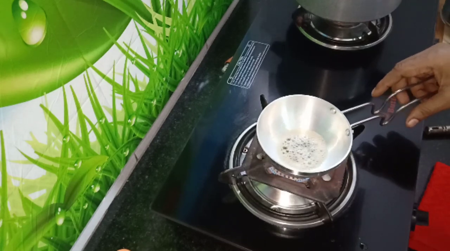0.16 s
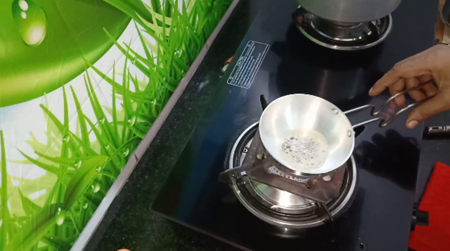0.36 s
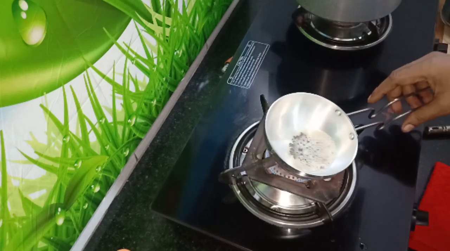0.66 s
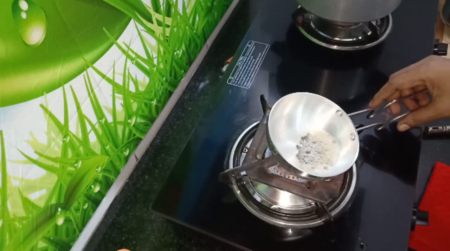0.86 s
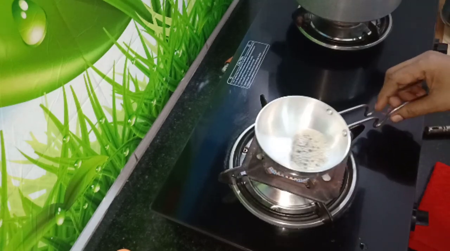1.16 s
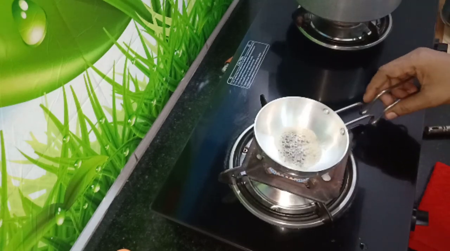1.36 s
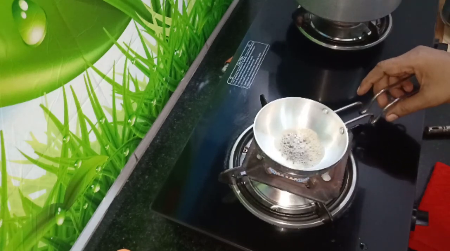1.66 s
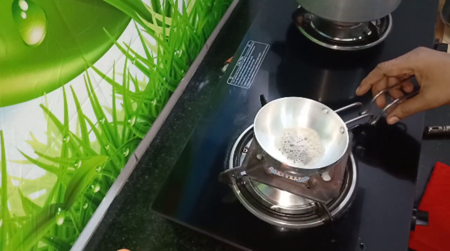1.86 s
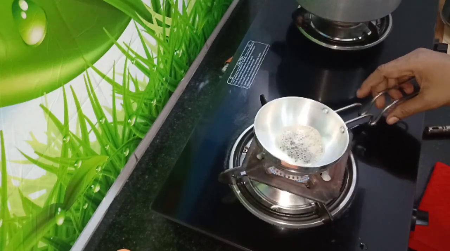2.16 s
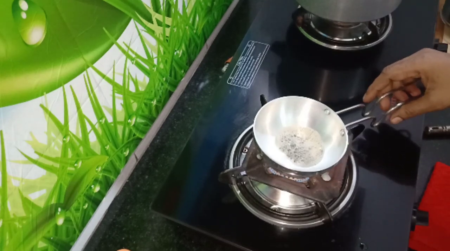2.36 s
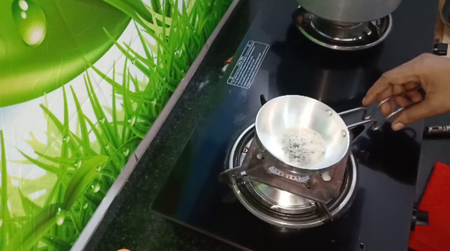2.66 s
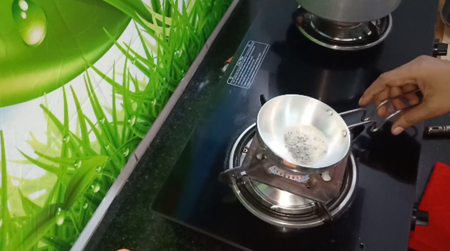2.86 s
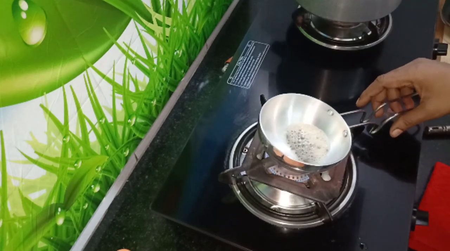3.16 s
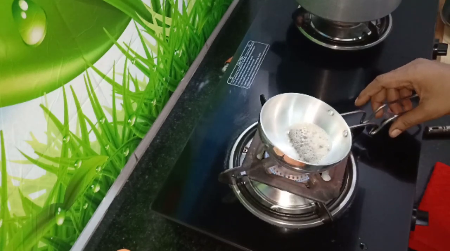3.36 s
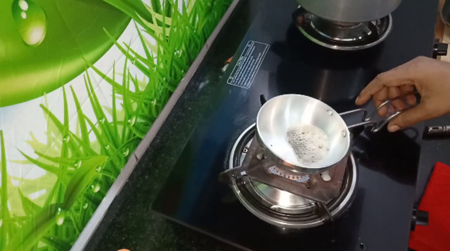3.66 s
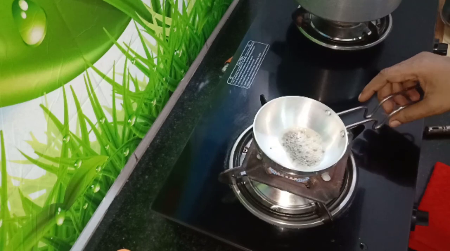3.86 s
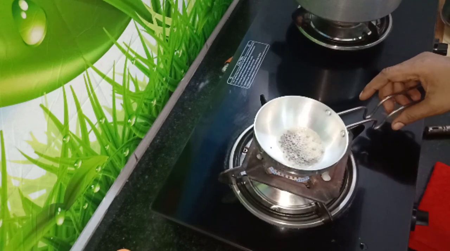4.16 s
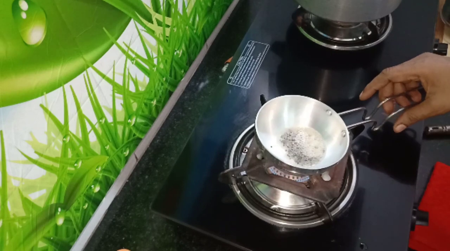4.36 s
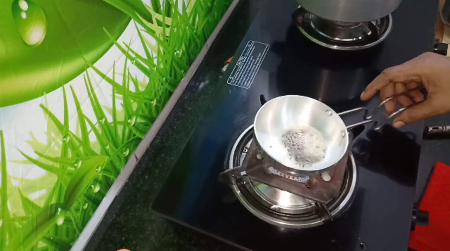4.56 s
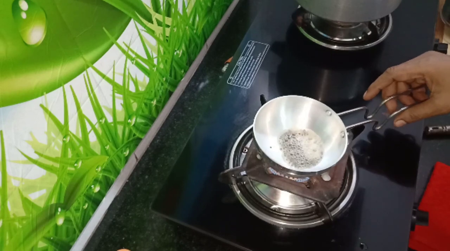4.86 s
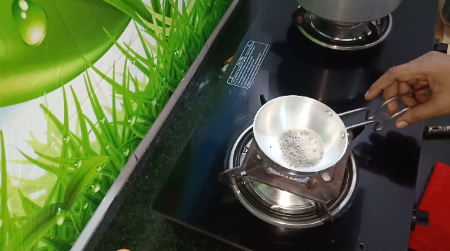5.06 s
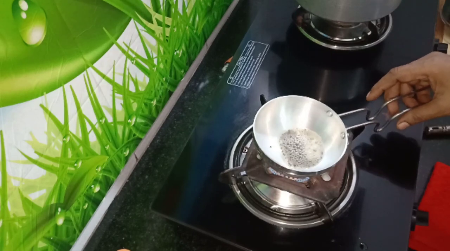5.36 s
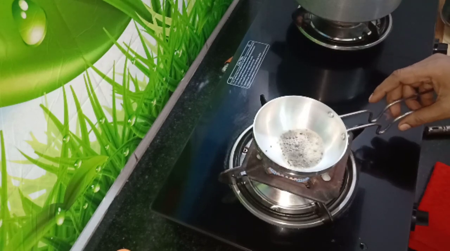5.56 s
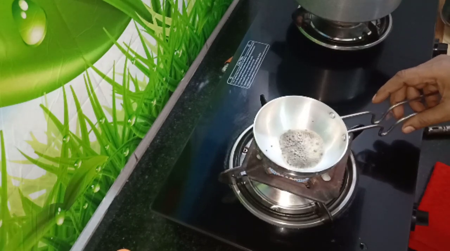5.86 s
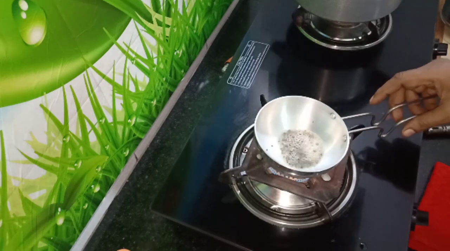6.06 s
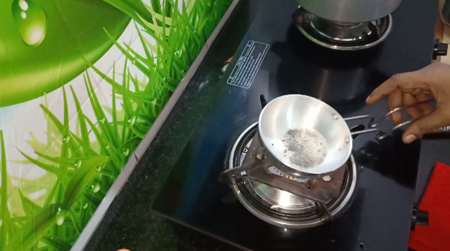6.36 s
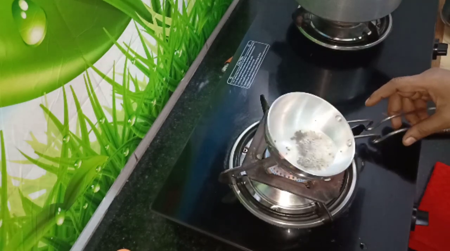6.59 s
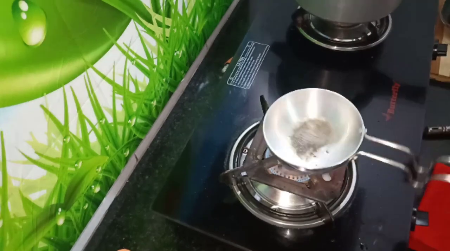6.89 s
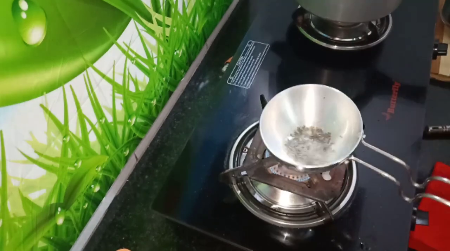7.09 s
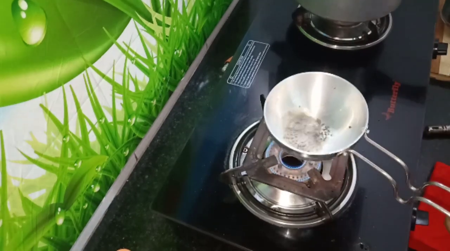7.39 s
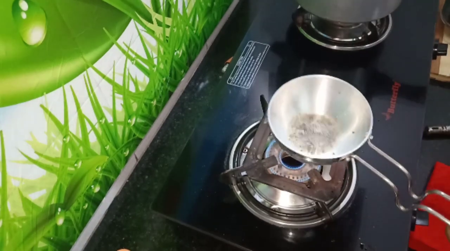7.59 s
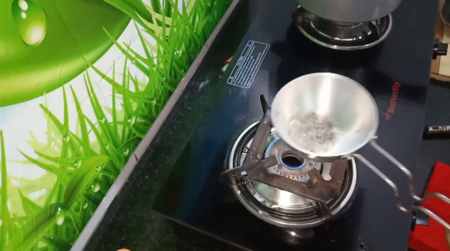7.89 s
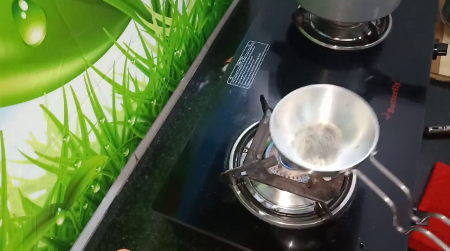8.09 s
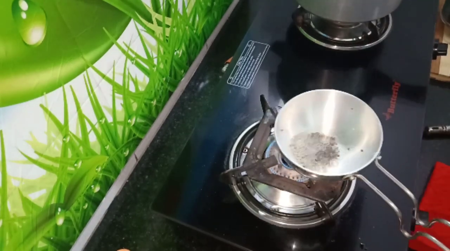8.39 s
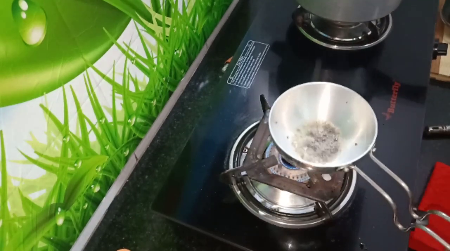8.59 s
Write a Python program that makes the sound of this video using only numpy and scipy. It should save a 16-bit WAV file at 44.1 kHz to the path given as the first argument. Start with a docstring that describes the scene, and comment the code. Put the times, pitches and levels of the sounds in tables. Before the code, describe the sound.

A close view of a small metal pan on a gas burner in a reflective kitchen. Throughout, a soft, dark flame rush and a faint, wavering motor hum around 100 Hz stay in the background. From 0 to 3 s, mustard seeds pop singly, each a bright crack with a very short ring near 3 kHz; a loud one comes at 0.8 s. Dull pan knocks and scrapes sound around 1.1-1.4 and 2.2 s, then at 3.7, 4.5, 5.6 and, strongest, 5.9 s. A low thump of spatter strikes the microphone at 4.2 s. From 4.4 s pops cluster, with fine frying ticks between. After 6 s they become rapid and hard, and from about 7 s a dense, loud crackle runs unbroken to the cut at 8.7 s. Sharp spatter snaps hit the microphone, especially around 6.7-7.2 s, and at 7.7-8.2 s.

```python
"""The rush of a gas flame and a wavering motor hum come first (shaped noise, sines); mustard seeds burst over them.
Each pop is a bright crack and a short resonance, echoed in the metal pan and the kitchen; single pops become a
dense crackle, and fine frying ticks, random in time, grow in between as the oil heats.
The pan shifts on its grate now and then (slips excite its modes and a rasp), and a few flying seeds and oil drops
hit the microphone (a snap and a relaxing pressure jump)."""
import sys
import numpy as np
from scipy import signal
from scipy.fft import rfft, irfft
from scipy.io import wavfile

SR = 44100
rng = np.random.default_rng(int(sys.argv[2]) if len(sys.argv) > 2 else 0)


def inscribe(sig):
    """Save sig as 16-bit PCM at rate SR to the path in sys.argv[1].

    A 1-D sig is mono; a 2-D sig holds one channel per row.
    Samples are clipped to [-1, 1] before scaling.
    """
    pcm = np.round(np.clip(np.atleast_2d(sig).T, -1, 1) * 32767)
    wavfile.write(sys.argv[1], SR, pcm.astype(np.int16))


N = 384974
TIME = np.arange(N) / SR
SIZE = 2048  # samples in a short pulse
HZ = np.maximum(np.arange(SIZE // 2 + 1) * SR / SIZE, 1)


def from_db(db):
    """Level: decibels to amplitude gain."""
    return 10 ** (np.asarray(db) / 20)


def rms_one(x):
    """Normalization: scale to unit rms."""
    return x / np.sqrt(np.mean(x ** 2) + 1e-20)


def colour(points, hz):
    """Spectral envelope: gain interpolated in dB over log frequency."""
    at, db = np.transpose(points)
    return from_db(np.interp(np.log(hz + 1e-9), np.log(at), db))


def causal(gain):
    """Minimum phase: the most compact causal pulse with this spectrum, at unit energy."""
    cepstrum = irfft(np.log(gain + 1e-9))
    # fold the anticausal half onto the causal half
    cepstrum[1:SIZE // 2] *= 2
    cepstrum[SIZE // 2 + 1:] = 0
    pulse = irfft(np.exp(rfft(cepstrum)))
    return pulse / np.linalg.norm(pulse)


def add(out, s, sound):
    """Superposition: mix a sound in at a time in seconds."""
    i = int(np.clip(round(s * SR), 0, N - 1))
    out[i:i + len(sound)] += sound[:N - i]


def ring(x, hz, t60):
    """Modal resonance: a driven mode that decays by 60 dB in t60 seconds."""
    radius = 1000 ** (-1 / (t60 * SR))
    w = 2 * np.pi * hz / SR
    return signal.lfilter([0, np.sin(w)], [1, -2 * radius * np.cos(w), radius ** 2], x + 1e-18)


# spectral envelope of the flame: f/Hz, relative level/dB
FLAME_COLOUR = [(20, -40), (45, -16), (75, -6.5), (95, -2), (180, -5.5), (370, -3), (500, -12),
                (850, -12.5), (1200, -16), (3500, -22.5), (4600, -32), (5600, -42.5), (7300, -34),
                (8700, -36), (10000, -44), (15500, -44)]


def flame(level_db=-45.5):
    """Turbulent combustion noise: a steady random rush with a fixed spectral envelope."""
    spectrum = rfft(rng.standard_normal(N))
    rush = irfft(spectrum * colour(FLAME_COLOUR, np.fft.rfftfreq(N, 1 / SR)), N)
    return from_db(level_db) * rms_one(rush)


# swelling and fading of the motor's lowest tone, before the random throb: t/s, level/dB
HUM_SWELL = [(0, -51), (.3, -55), (.7, -45), (1.2, -53), (1.7, -49.5), (2.5, -49.5), (2.9, -57),
             (3.5, -56.5), (4.3, -49), (4.95, -45.5), (5.3, -55.5), (6.4, -50.5), (7.5, -57), (8.73, -50.5)]
# the motor's other tones, before the random throb: f/Hz, level/dB
HUM_TONES = [(146, -57), (221, -57.5), (258, -60), (333, -71), (367, -57), (845, -65.5)]
HUM_HZ = 96.4  # mean pitch of the lowest tone


def motor(waver_hz=4.72, throb_db=2.5, count=110):
    """Frequency and amplitude modulation: low tones waver at random in pitch and strength."""
    out = 0
    knots = np.linspace(0, TIME[-1], count)
    lowest_db = np.interp(TIME, *np.transpose(HUM_SWELL))
    for hz, level_db in [(HUM_HZ, lowest_db), *HUM_TONES]:
        waver, throb = (np.interp(TIME, knots, chance) for chance in rng.standard_normal((2, count)))
        tone = np.sin(2 * np.pi * np.cumsum(hz + waver_hz * waver) / SR)
        out = out + from_db(level_db + throb_db * throb) * rms_one(tone)
    return out


# decay of the kitchen: f/Hz, reverberation time T60/s
KITCHEN_T60 = [(200, 0.65), (1500, 0.37), (3300, 0.34), (8000, 0.3), (15000, 0.34)]
# reflections off hob and wall: delay/s, level/dB
REFLECTIONS = [(.0057, -35), (.0074, -16.5), (0.017, -31.5), (0.0156, -17.5)]


def kitchen(x, wet_db=-10.0, build_s=0.0072):
    """Reverberation: early reflections and a diffuse tail that builds up, then decays band by band."""
    t = np.arange(SR // 2) / SR
    edges = np.geomspace(120, 17000, 9)
    tail = 0
    for low, high in zip(edges, edges[1:]):
        band_pass = signal.butter(2, [low, high], "band", fs=SR, output="sos")
        band = signal.sosfilt(band_pass, rng.standard_normal(len(t)))
        t60 = np.interp(np.sqrt(low * high), *np.transpose(KITCHEN_T60))
        tail = tail + band * 1000 ** (-t / t60)
    tail = tail * (1 - np.exp(-(t / build_s) ** 2))
    response = from_db(wet_db) * tail / np.linalg.norm(tail)
    for delay_s, level_db in REFLECTIONS:
        add(response, delay_s, from_db([level_db]))
    return signal.oaconvolve(x, response)[:N]


# the pan knocks and slides on the grate: t/s, level/dB, slide time constant/s, favoured mode f/Hz
SHIFTS = [(1.07, -36, 0.023, 320), (1.186, -41.5, 0.012, 260), (1.346, -41.5, 0.026, 475),
          (2.152, -33, 0.016, 412), (2.188, -37, 0.0078, 260), (3.698, -35.5, 0.012, 560),
          (4.497, -35.5, 0.02, 415), (5.541, -49, 0.00067, 2060), (5.613, -34.5, 0.0031, 1130),
          (5.637, -43, 0.0045, 260), (5.869, -27, 0.0044, 475)]
# modes of the pan on its grate: f/Hz, relative level/dB, T60/s
GRATE_MODES = [(259.6, 7.5, 0.2), (473.4, 14, 0.1), (515, 1, 0.16), (804, 0.5, 0.11), (906, 0, 0.16),
               (1160, 3.5, 0.02), (1354, -6, 0.072), (2020, 1.5, 0.024), (2720, 0, 0.012)]
# spectral envelope of the sliding rasp: f/Hz, relative level/dB
RASP_COLOUR = [(40, -55), (150, -24), (280, -14), (500, 14), (700, 11.5), (1200, 3.5), (2600, -0.5),
               (4000, -7), (8000, -60)]


def pan_shifts(slips_per_s=1600, rasp_db=-6, favour_db=16.5, choosiness=10.0):
    """Stick-slip excitation: a run of slips swells and dies, driving the pan's modes and a dull rasp."""
    out = np.zeros(N)
    t = np.arange(SR // 2) / SR
    for s, level_db, slide_s, favoured_hz in SHIFTS:
        slipping = rng.random(len(t)) < slips_per_s / SR
        slips = rng.standard_normal(len(t)) * slipping * t * np.exp(-t / slide_s)
        modes = 0
        for hz, mode_db, t60 in GRATE_MODES:
            # the place of contact favours a mode
            nearness = np.exp(-(choosiness * np.log(hz / favoured_hz)) ** 2)
            modes = modes + from_db(mode_db + favour_db * nearness) * rms_one(ring(slips, hz, t60))
        rasp = signal.fftconvolve(slips, causal(colour(RASP_COLOUR, HZ)))[:len(t)]
        sound = rms_one(modes) + from_db(rasp_db) * rms_one(rasp)
        # the level refers to the first 50 ms
        add(out, s, from_db(level_db) * sound / np.std(sound[:SR // 20]))
    return out


# hits on the microphone: t/s, signed pressure factor before rise and filters, relaxation time/ms
SPATTER = [(4.1660, 5, 1), (5.9643, 1.2, 1), (6.1223, 0.15, 0.26), (6.7249, 1.4, 0.092),
           (6.9268, 1.17, 0.087), (7.0780, 0.23, 0.16), (7.1034, 1.05, 0.12), (7.1474, -1.5, 0.12),
           (7.1631, 1.5, 0.058), (7.7164, 1.5, 0.1), (7.8010, 1.24, 0.042), (8.2079, 1, 0.95)]


def spatter(leak_hz=76, damping=0.57, soft_hz=4500):
    """Pressure relaxation: a jump at the port dies away and the microphone's bass roll-off swings it back."""
    out = np.zeros(N)
    ms = 1000 * np.arange(SIZE) / SR
    for s, pressure, relax_ms in SPATTER:
        rise = 1 - np.exp(-10 * ms / relax_ms)  # the longer a hit relaxes, the slower it lands
        add(out, s, pressure * np.exp(-ms / relax_ms) * rise)
    w = 2 * np.pi * leak_hz
    bass_cut = signal.bilinear([1, 0, 0], [1, 2 * damping * w, w * w], SR)
    out = signal.lfilter(*bass_cut, out + 1e-18)
    return signal.lfilter(*signal.butter(1, soft_hz, fs=SR), out)


# liveliness of the pan as the oil heats: t/s, share of the full crackle 0-1
HEAT = [(0, 0.05), (4, 0.2), (5.5, .25), (6.5, .8), (7.3, 1), (8.73, .95)]


def heat(s):
    """Thermal activity: liveliness of the pan at these times, 0-1."""
    return np.clip(np.interp(s, *np.transpose(HEAT)), 0, 1)


TICKS_PER_S = 75  # mean rate at full heat
TICK_DB, COOL_OIL_DB = -39, -16  # base level; the second, times (1.5 - liveliness), is added to it


def frying(spread_db=8.5, crack_db=-7, dryness_db=4.0, low_hz=1900, high_hz=4000, count=24):
    """Poisson process: bubbles burst at random, rounder or drier, more often and harder in hotter oil."""
    lively = heat(TIME)
    born = rng.random(N) < TICKS_PER_S * lively / SR
    chance_db = spread_db * np.clip(rng.standard_normal(N), -2, 2)
    sizes = from_db(COOL_OIL_DB * (1.5 - lively) + chance_db)
    dealt = rng.integers(0, count, N)
    pitches = np.geomspace(low_hz, high_hz, count)
    dryness = dryness_db * rng.uniform(-0.95, 1, count)
    ticks = []
    for hz, dry_db in zip(pitches, dryness):
        # a dry bubble has less ring and more crack
        tick, _ = pop(TICK_DB - dry_db, hz, TICK_DB + crack_db + dry_db)
        ticks.append(tick)
    out = np.zeros(N)
    for i in np.flatnonzero(born):
        add(out, i / SR, sizes[i] * ticks[dealt[i]])
    return out


def bowl_echoes(wall_s=0.001183, wall=0.31, scatter=0.81, scatter_s=0.0037, echoes_per_s=3500):
    """Comb filtering: direct sound, a hollow-sounding wall bounce, and scattered echoes from pan and stove."""
    t = np.arange(SIZE) / SR
    present = rng.random(SIZE) < echoes_per_s / SR
    path = rng.standard_normal(SIZE) * present * np.exp(-t / scatter_s) * (t > wall_s / 4)
    path *= scatter / (np.linalg.norm(path) + 1e-9)
    path[0] = 1
    # every seed lies elsewhere, so the bounce varies in delay and strength
    bounce = int(wall_s * SR * rng.uniform(.9, 1.15))
    path[bounce] += wall * rng.uniform(0.11, 1.53)
    return path


def patchy(spread_db, count):
    """Random spectral irregularity: a hilly gain, for no two husks break alike."""
    hills_db = spread_db * rng.standard_normal(count)
    return from_db(np.interp(HZ, np.linspace(0, SR / 2, count), hills_db))


# spectral envelope of the ring in the bowl: f/Hz, relative level/dB
BOWL_COLOUR = [(150, -12), (500, -22.5), (850, -9), (1250, 1.5), (1680, 10), (2150, -1), (2520, 3.5),
               (2850, -2.5), (3300, 8.5), (3650, 3), (4000, 6), (4800, -1), (5600, -15), (9000, -39.5)]
# spectral envelope of the splitting husk: f/Hz, relative level/dB
CRACK_COLOUR = [(200, -11), (1500, 4.5), (4500, 2), (5600, -6), (6900, 2.5), (8700, -1), (9900, -9),
                (12000, -10.5), (13500, -11.5), (15300, -8.5), (16000, -34)]


def pop(ring_db, pitch_hz, crack_db, sharpness=1.16, purity=0.11, swell_s=.00007, brightening=0.24,
        top_hz=6500, top_spread_db=4.0, hardness=0.14, typical_crack_db=-33):
    """Impulse and resonance: a husk cracks and its steam burst rings: (near sound, sound sent to the room)."""
    attack = SR // 250  # levels refer to the first 4 ms
    # the more the steam outweighs the crack, the purer the ring
    quality = sharpness * np.exp(purity * np.clip(ring_db - crack_db, 0, 20))
    detuning = HZ / pitch_hz - pitch_hz / HZ
    burst = causal(colour(BOWL_COLOUR, HZ) / np.hypot(1, quality * detuning))
    burst = burst * (1 - np.exp(-np.arange(SIZE) / (swell_s * SR)))
    # a dry split with little steam tends to be bright, and a hard one brighter than a faint one
    bright_db = brightening * (np.clip(crack_db - ring_db, -16, 6) + 3.5)
    bright_db += top_spread_db * rng.standard_normal()
    bright_db += hardness * (crack_db - typical_crack_db)
    top_db = bright_db * np.clip(HZ / top_hz - 1, 0, 1)
    crack = causal(colour(CRACK_COLOUR, HZ) * from_db(top_db) * patchy(3.0, count=14))
    out = 0
    for level_db, pulse in (ring_db, burst), (crack_db, crack):
        near = signal.fftconvolve(pulse, bowl_echoes())[:SIZE]
        both = np.array([near, pulse])
        # the polarity is inverted
        out = out - from_db(level_db) * both / np.std(both[:, :attack], axis=1, keepdims=True)
    return out


# a burst jolts a neighbour, which goes off just after it and, on average, more weakly
JOLT_CHANCE = .65  # at full heat
JOLT_SOONEST_S, JOLT_LATEST_S = 0.0067, 0.025
JOLT_RING_DB, JOLT_CRACK_DB, JOLT_SPREAD_DB = -11.5, -5, 2.5  # relative to the first burst
SEED_HZ, SEED_SPREAD_OCTAVES = 3010, 0.22


def neighbours():
    """Triggered events: the hotter the oil, the likelier one burst sets off another; rows as in POPS."""
    s, ring_db, _, crack_db = np.transpose(POPS)
    luck, wait = rng.random((len(s), 2)).T
    ring_by, pitch_by, crack_by = rng.standard_normal((len(s), 3)).T
    rows = np.transpose([s + JOLT_SOONEST_S + wait * (JOLT_LATEST_S - JOLT_SOONEST_S),
                         ring_db + JOLT_RING_DB + JOLT_SPREAD_DB * ring_by,
                         SEED_HZ * 2 ** (SEED_SPREAD_OCTAVES * pitch_by),
                         crack_db + JOLT_CRACK_DB + JOLT_SPREAD_DB * crack_by])
    return rows[luck < JOLT_CHANCE * heat(s) ** 2]


# every spatter hit has a snap: sharp from a hard seed, weak from a slow, soft drop
SNAP_RING_DB, SNAP_HZ = -42, 2430
SNAP_CRACK_DB, SNAP_DB_PER_MS = -25.5, -7  # crack before the lift, at zero relaxation; change with relaxation
# the seeds that stand out: t/s, ring level/dB, ring f/Hz, crack level/dB before the lift
POPS = [(0.046, -55, 2700, -41.5), (0.3302, -43, 2870, -43.5), (0.3493, -39, 2080, -42),
        (.661, -72, 2800, -47.5), (0.822, -15, 3720, -28), (1.2467, -30.5, 3520, -48.5),
        (1.567, -23, 3160, -25.5), (1.7933, -29.5, 2800, -38), (1.9198, -43.5, 2570, -52),
        (2.0606, -36.5, 2500, -38.5), (2.3844, -39, 3530, -38.5), (2.4041, -35.5, 2670, -51),
        (2.4903, -49, 2000, -43), (2.685, -29.5, 2970, -35.5), (3.0036, -29.5, 3720, -35.5),
        (3.1344, -22.5, 3900, -30.5), (3.1984, -63, 3830, -44), (3.374, -42.5, 2430, -46),
        (3.443, -24, 3780, -34), (3.532, -32.5, 2980, -45), (3.8168, -39, 3200, -27.5),
        (3.8574, -35.5, 2060, -42), (3.9055, -20, 2970, -29.5), (4.2264, -26, 3020, -39),
        (4.3802, -30.5, 3100, -33.5), (4.4225, -13, 3440, -30), (4.4465, -31, 2600, -30.5),
        (4.551, -23.5, 2900, -35.5), (4.5894, -21.5, 3150, -27), (4.6246, -32, 2530, -42),
        (4.8061, -47, 3700, -34.5), (4.8323, -26, 2640, -34.5), (4.8558, -22, 3900, -32),
        (4.973, -49, 3400, -41.5), (4.9974, -31.5, 3720, -35), (5.081, -37, 3140, -33),
        (5.1362, -34, 2700, -43.5), (5.2197, -16.5, 2980, -29.5), (5.225, -16.5, 3120, -34),
        (5.245, -27, 3330, -31), (5.2936, -14, 2730, -38), (5.3784, -44, 3300, -40),
        (5.4026, -35, 2700, -40), (5.4267, -36.5, 3060, -31), (5.5257, -23, 3020, -31.5),
        (5.545, -20.5, 2530, -30), (5.625, -21.5, 2830, -24.5), (5.712, -16, 2820, -29),
        (5.729, -26.5, 2500, -46), (5.7635, -33.5, 3600, -38.5), (5.7956, -31.5, 3220, -36),
        (5.846, -33, 3020, -30.5), (5.8736, -17.5, 2660, -29.5), (5.9286, -47, 2700, -25.5),
        (5.981, -24, 3540, -35.5), (6.0169, -21, 3200, -21), (6.163, -21, 3770, -34),
        (6.1705, -14.5, 3650, -27.5), (6.286, -25, 4100, -28), (6.306, -31, 3700, -34),
        (6.3384, -13, 3260, -25), (6.348, -25, 3600, -30.5), (6.3904, -17, 3260, -26),
        (6.4226, -25.5, 3700, -34.5), (6.4482, -20.5, 2370, -35.5), (6.4797, -20, 3300, -30.5),
        (6.5263, -29.5, 2020, -46), (6.5906, -27.5, 3030, -28), (6.641, -24, 1860, -24.5),
        (6.649, -18.5, 3780, -24), (6.7379, -17.5, 2860, -29.5), (6.7866, -20.5, 2660, -35),
        (6.8038, -23, 3070, -35), (6.828, -16.5, 3200, -37.5), (6.8578, -15, 3430, -26),
        (6.875, -29, 2840, -35), (6.9131, -19, 3160, -28), (6.967, -14, 3150, -29.5),
        (7.0293, -48, 2300, -28.5), (7.0367, -19, 2550, -42), (7.062, -19, 2640, -37),
        (7.0866, -15, 2680, -36), (7.1279, -17, 2540, -38), (7.183, -18, 3170, -34),
        (7.2505, -11, 2570, -31.5), (7.2664, -17.5, 2690, -30.5), (7.305, -24.5, 3280, -37),
        (7.3354, -16.5, 2770, -37), (7.4222, -17, 3160, -28.5), (7.4496, -20.5, 3020, -29.5),
        (7.4892, -36, 3050, -35), (7.4956, -16.5, 2910, -32.5), (7.565, -15, 2680, -34),
        (7.6042, -16, 3300, -35), (7.6456, -18, 3430, -34.5), (7.6593, -19.5, 3030, -35),
        (7.7022, -24, 3080, -29), (7.736, -23.5, 3400, -41), (7.7742, -16, 2500, -34),
        (7.8174, -18, 3060, -27.5), (7.8385, -14, 2670, -42), (7.8486, -18.5, 3250, -27.5),
        (7.9126, -19, 2370, -31), (7.9587, -10.5, 2740, -27.5), (8.0892, -18.5, 3540, -32),
        (8.167, -12, 2580, -30), (8.229, -21, 3470, -32), (8.3147, -28, 2584, -25),
        (8.3439, -18, 3180, -37), (8.3513, -13.5, 2720, -40), (8.3622, -16.5, 2770, -31.5),
        (8.3864, -14, 3150, -36), (8.4113, -21.5, 3650, -32), (8.4545, -14.5, 3050, -37),
        (8.461, -14.5, 3100, -26), (8.5032, -19.5, 3320, -31), (8.5385, -15, 3050, -28.5),
        (8.5833, -20.5, 2850, -31.5), (8.6391, -18.5, 2820, -33.5), (8.6538, -26, 2980, -43),
        (8.681, -18, 3100, -27.5), (8.6863, -12, 2770, -38)]


def seeds(crack_lift_db=1.82):
    """Superposed bursts: loud seeds, neighbours and spatter snaps: (near sound, sound sent to the room)."""
    near, sent = np.zeros((2, N))
    snaps = [(s, SNAP_RING_DB, SNAP_HZ, SNAP_CRACK_DB + SNAP_DB_PER_MS * relax_ms)
             for s, _, relax_ms in SPATTER]
    for s, ring_db, pitch_hz, crack_db in [*POPS, *snaps, *neighbours()]:
        to_microphone, to_room = pop(ring_db, pitch_hz, crack_db + crack_lift_db)
        add(near, s, to_microphone)
        add(sent, s, to_room)
    return near, sent


def scene():
    """Direct and reverberant field: pan sounds excite the room; flame, hum and spatter pressure stay dry."""
    steady = flame() + motor()
    pan = frying() + pan_shifts()
    pops, pops_sent = seeds()
    room = kitchen(pops_sent + pan)
    return (pops + pan + room + steady + spatter())[None]


def record(dry, cutoff_hz=15900):
    """Overload and band limiting: the loudest peaks clip, then a steep low-pass cuts the top."""
    clipped = np.clip(dry, -.93, .93)
    low_pass = signal.ellip(10, .1, 70, cutoff_hz, fs=SR, output="sos")
    return signal.sosfilt(low_pass, clipped)


dry = scene()
out = record(dry)
inscribe(out)
```